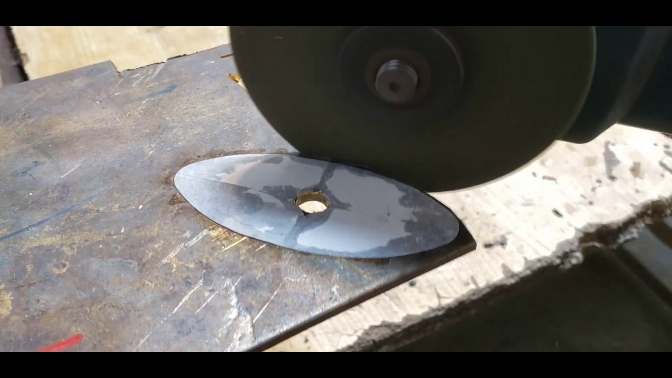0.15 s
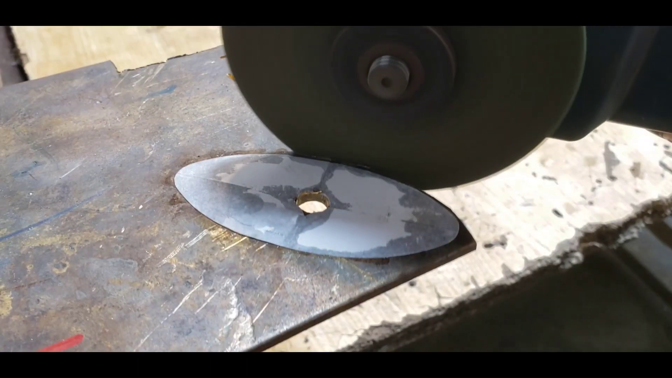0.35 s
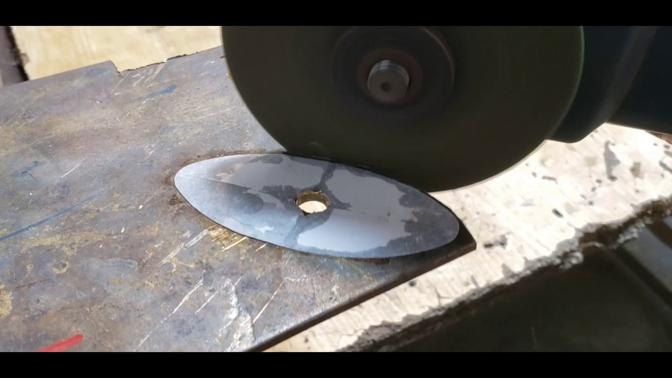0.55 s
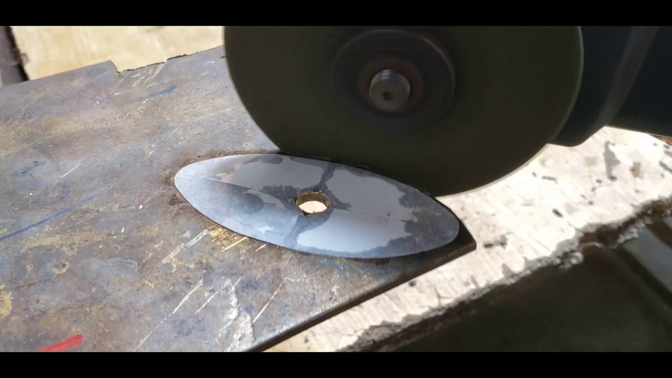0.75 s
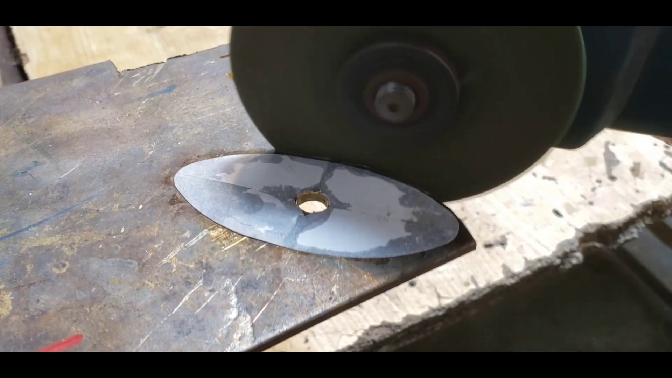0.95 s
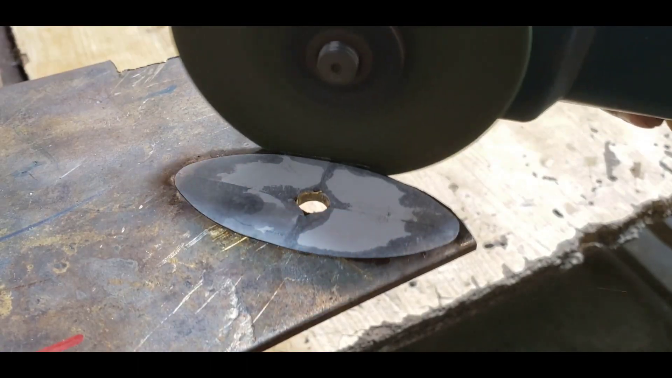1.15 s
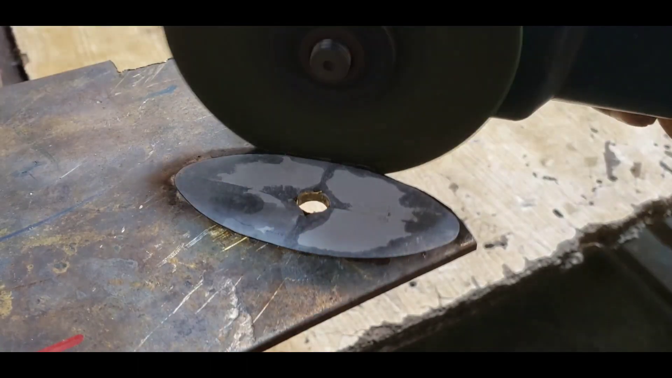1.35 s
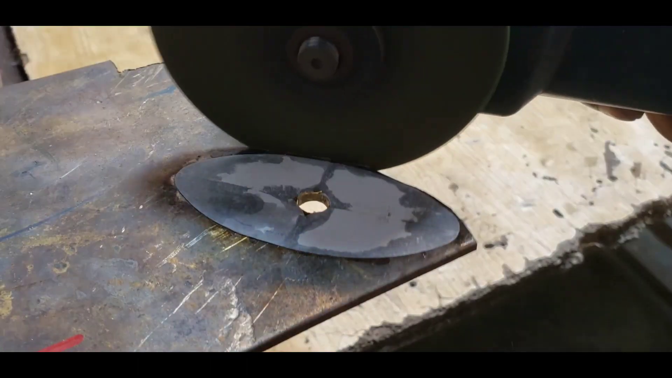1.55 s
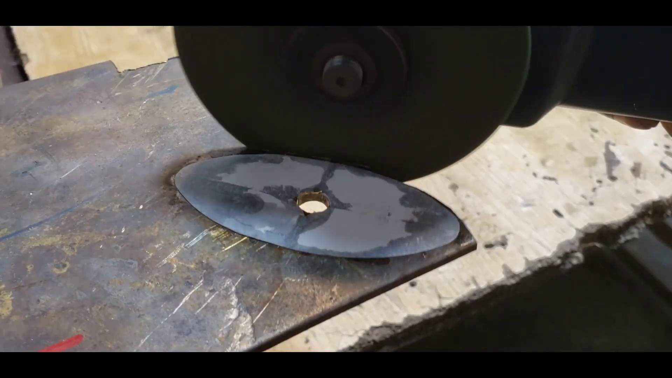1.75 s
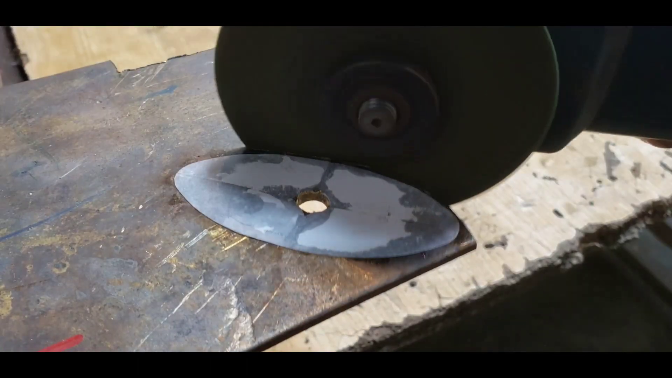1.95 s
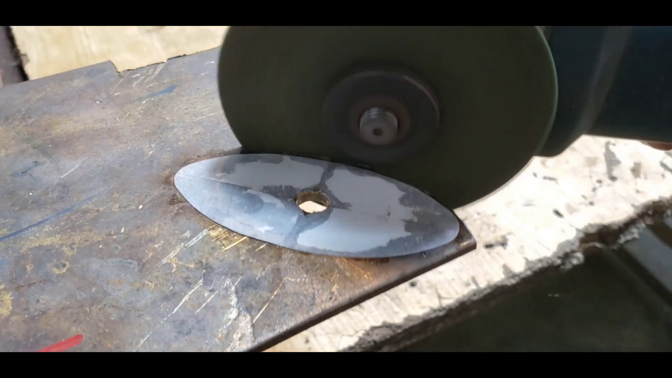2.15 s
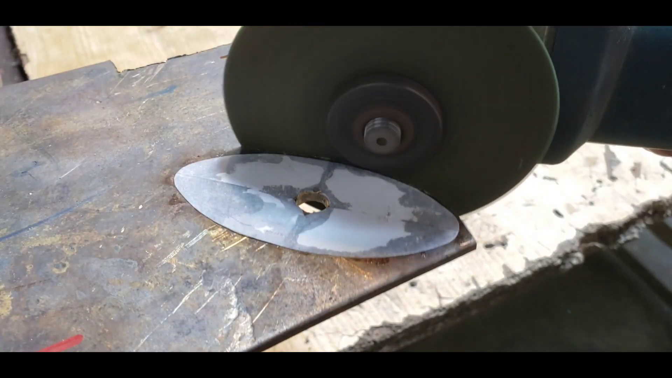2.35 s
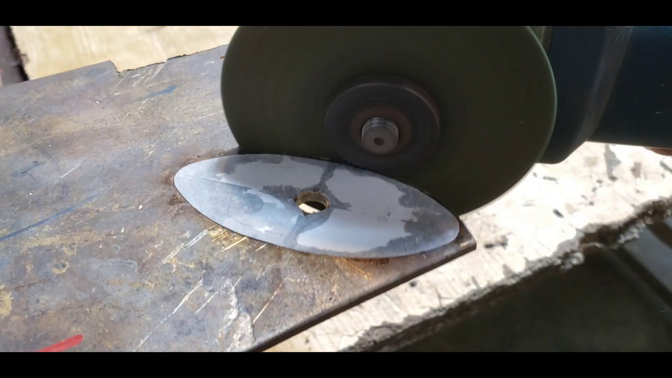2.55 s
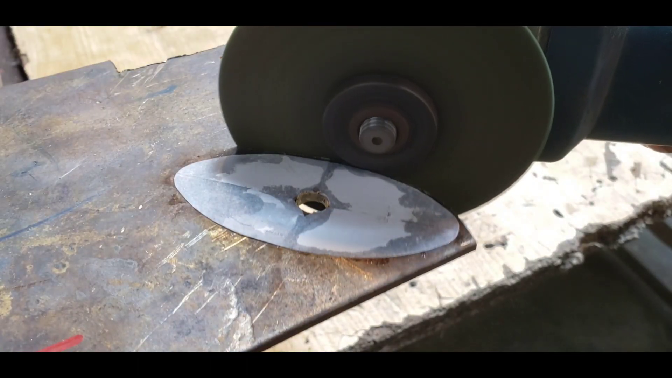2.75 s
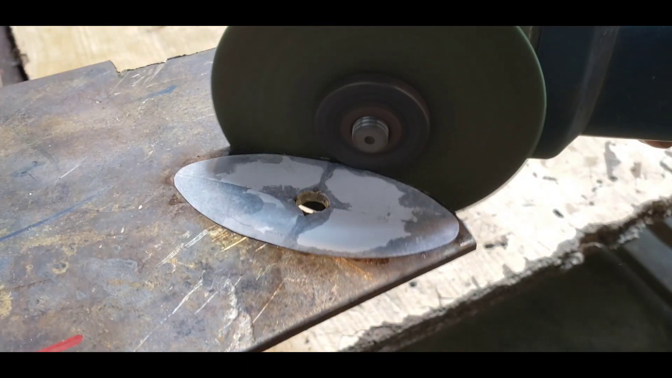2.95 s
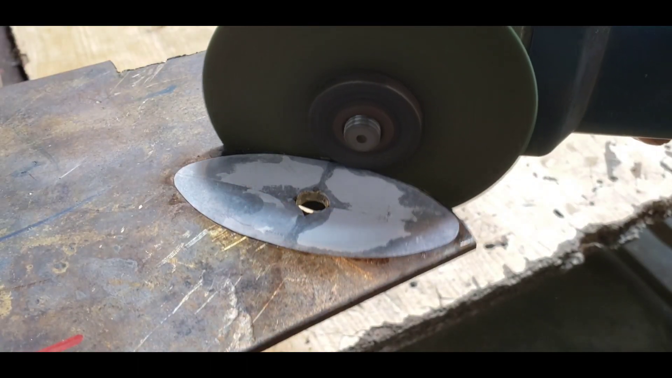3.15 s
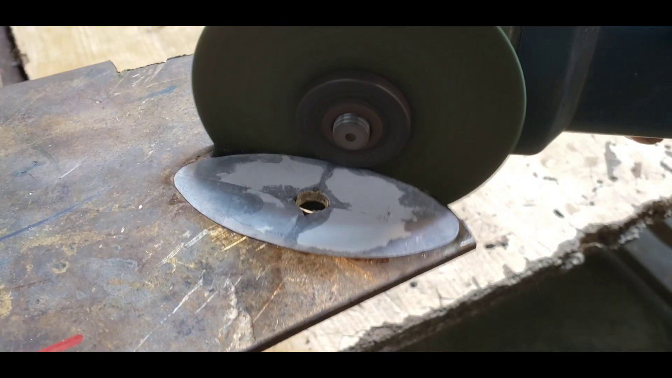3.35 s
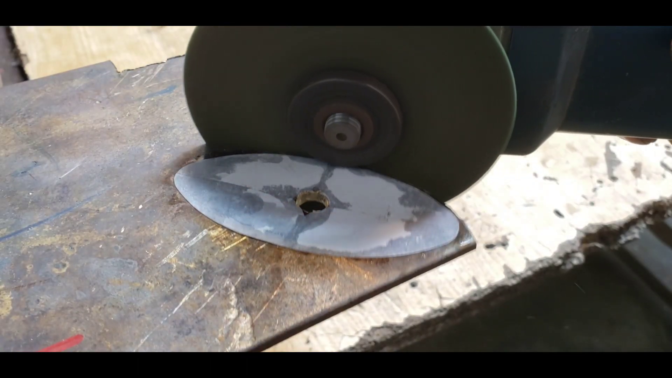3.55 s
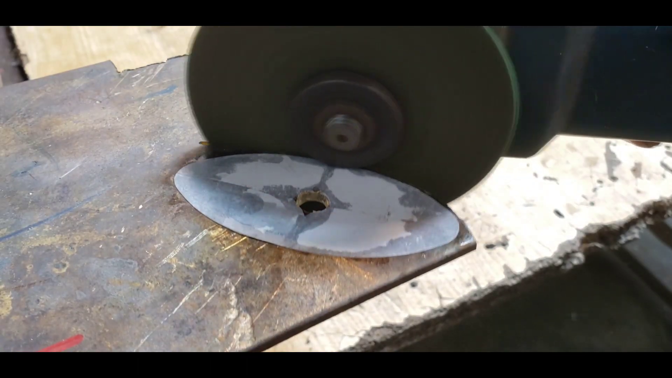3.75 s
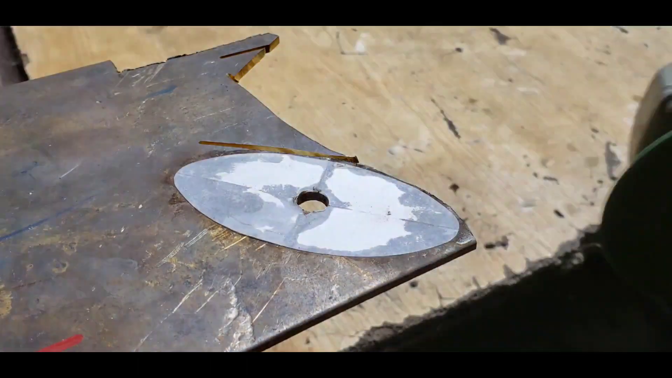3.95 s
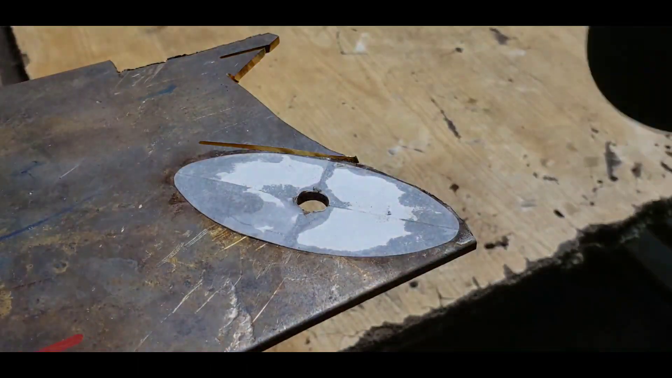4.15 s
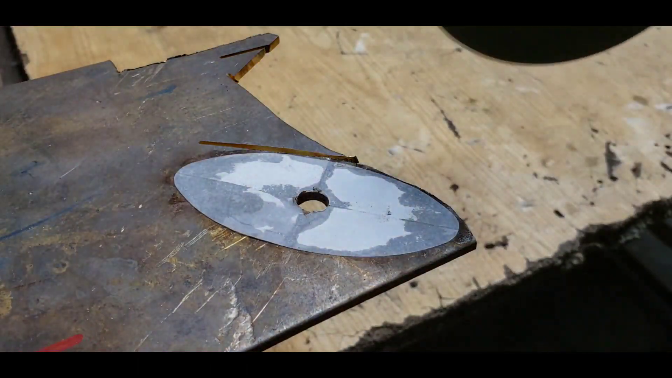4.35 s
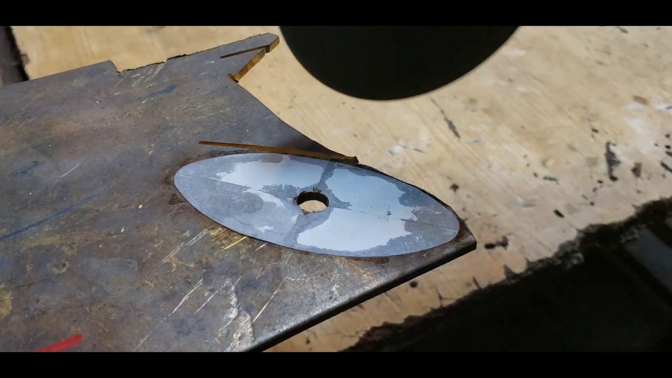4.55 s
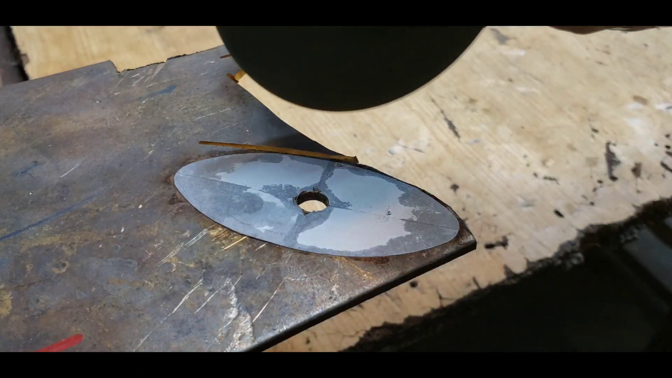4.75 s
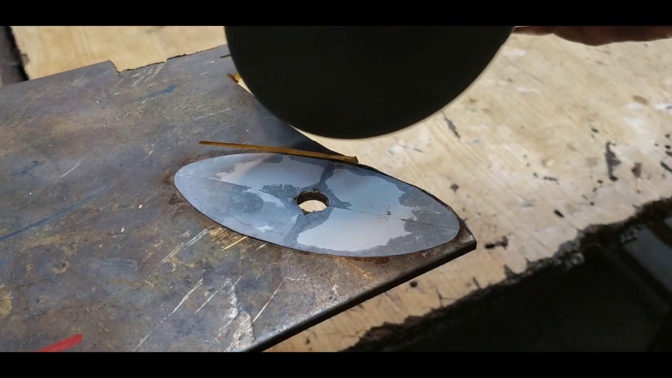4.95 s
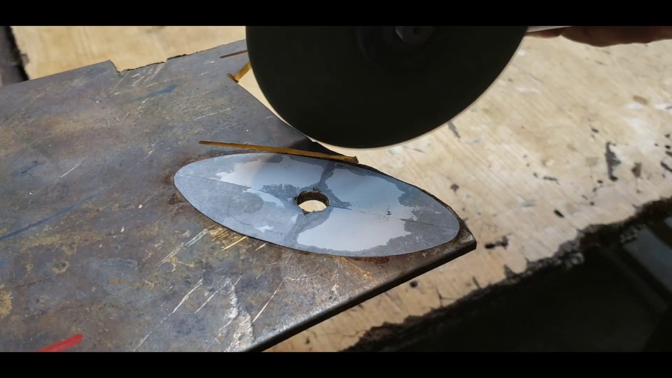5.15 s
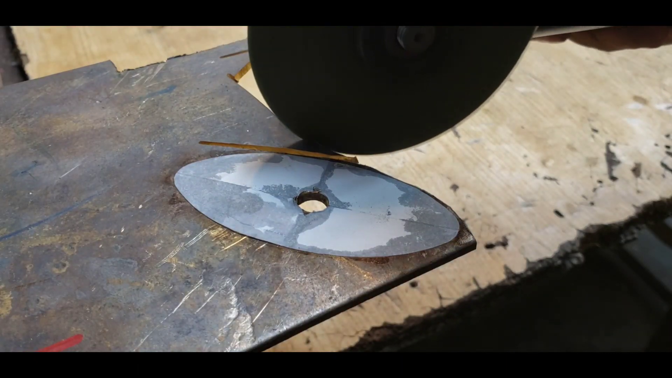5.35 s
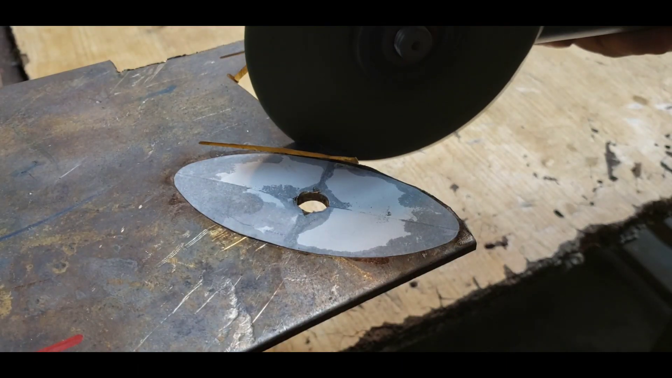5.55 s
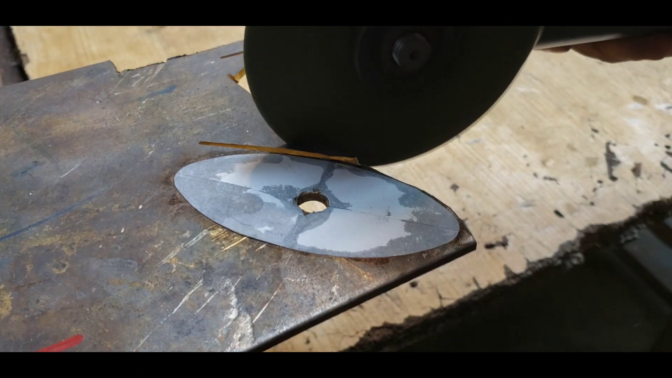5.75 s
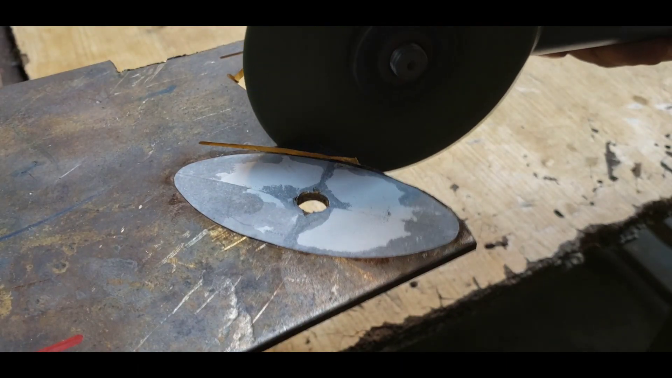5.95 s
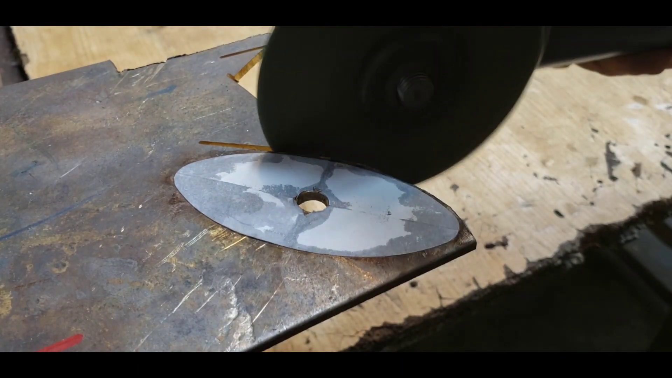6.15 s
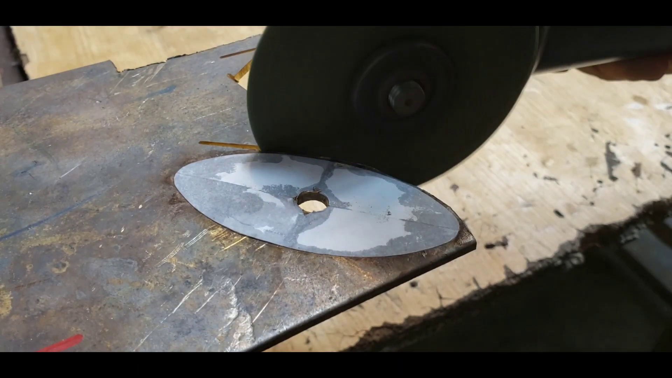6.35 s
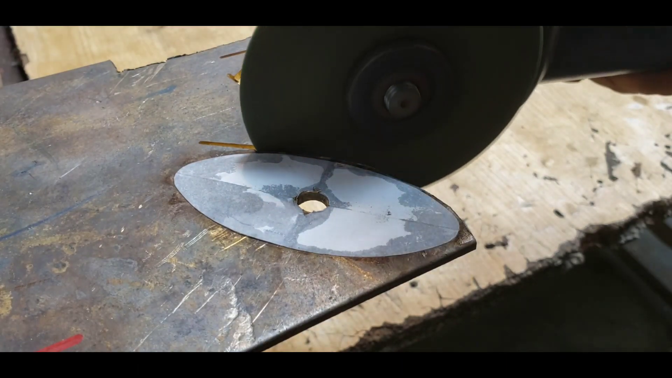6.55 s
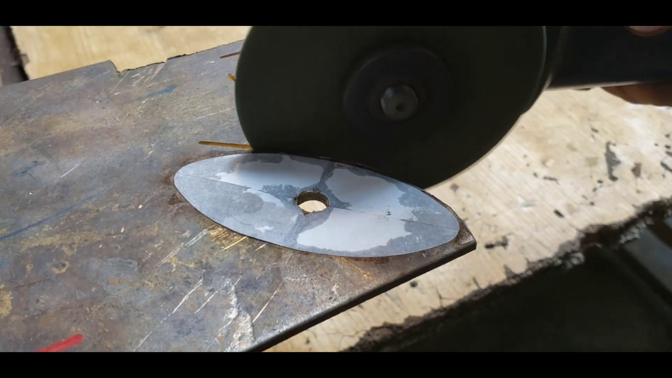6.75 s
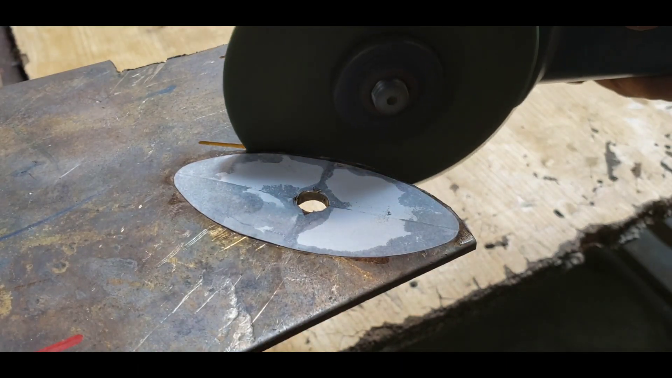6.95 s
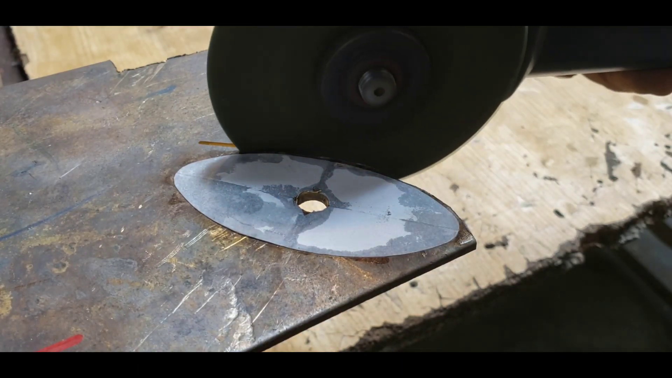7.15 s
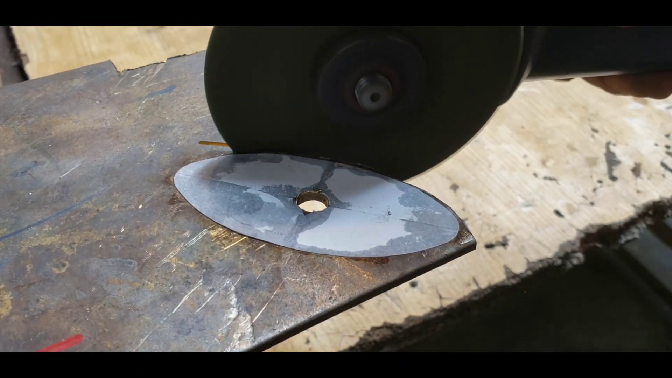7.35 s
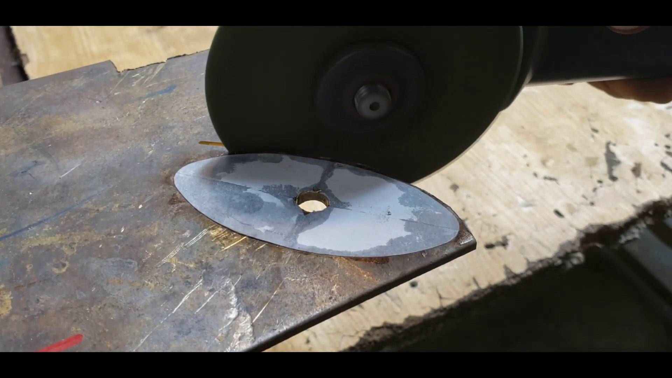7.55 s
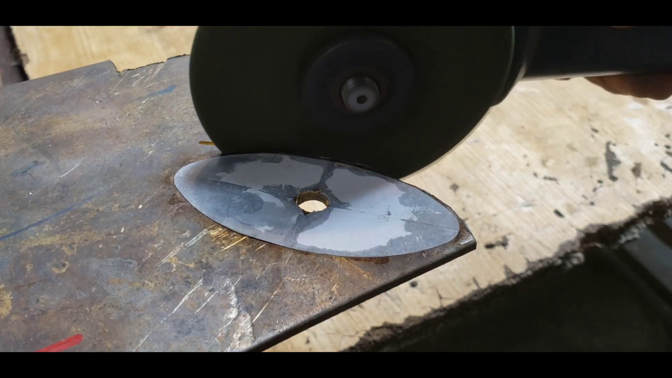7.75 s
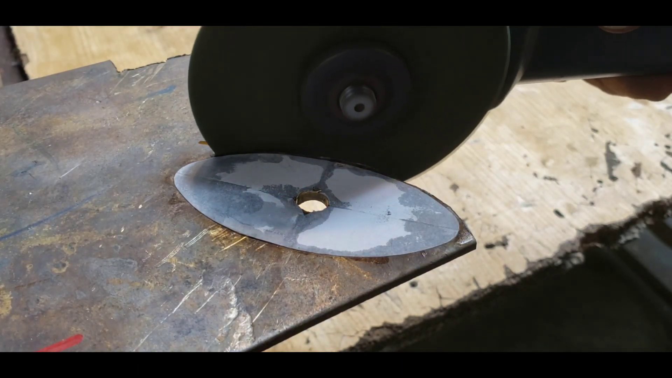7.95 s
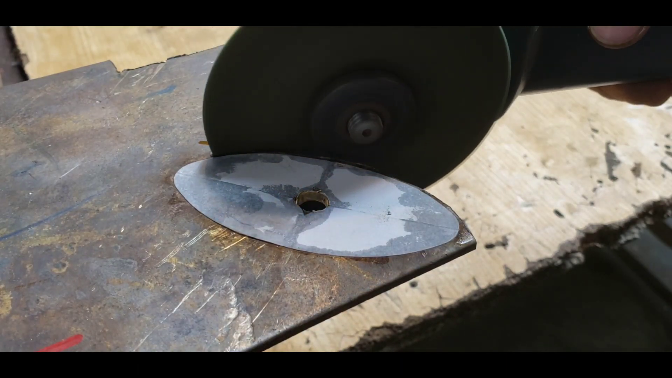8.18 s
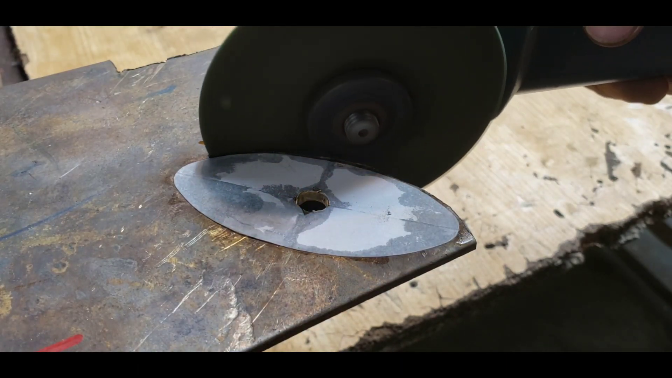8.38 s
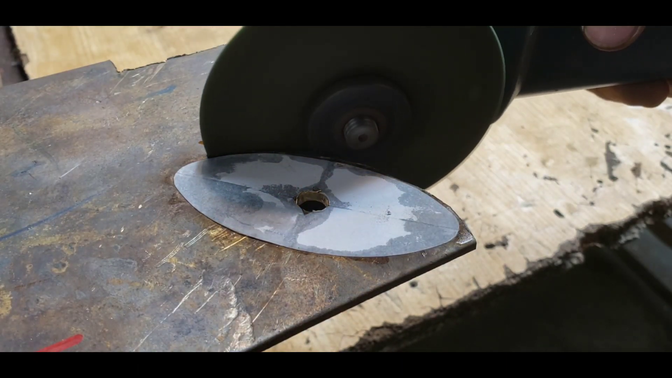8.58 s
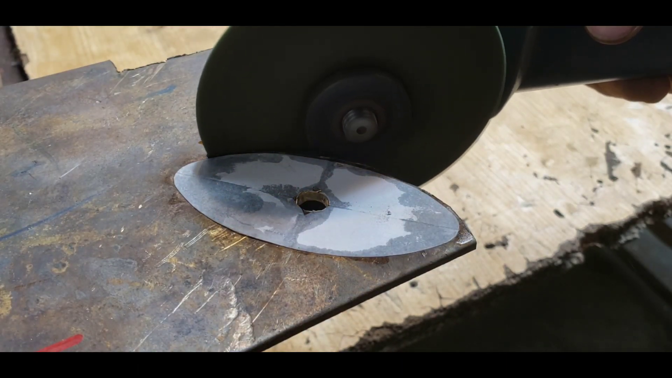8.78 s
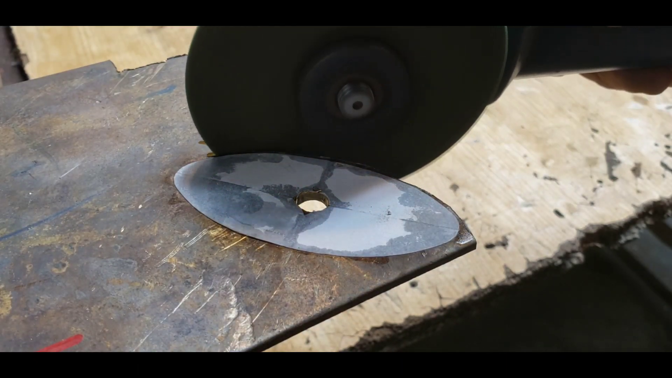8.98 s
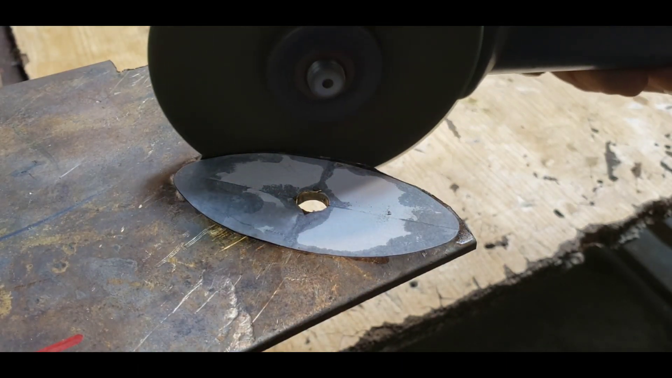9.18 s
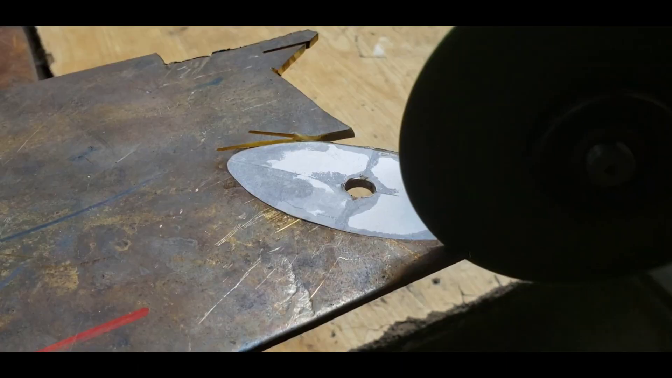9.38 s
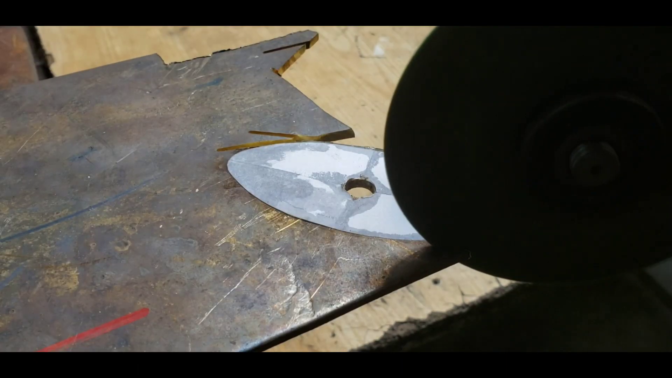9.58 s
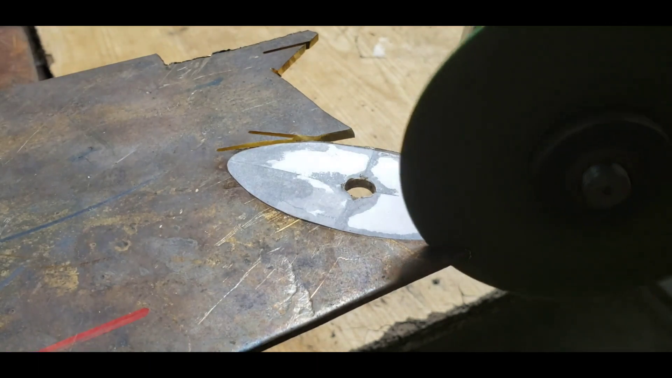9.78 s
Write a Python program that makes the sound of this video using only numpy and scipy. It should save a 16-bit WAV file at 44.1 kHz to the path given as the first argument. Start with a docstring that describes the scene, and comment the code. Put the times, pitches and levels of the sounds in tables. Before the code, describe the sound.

Gritty, ringing grinding of thin steel with whining ridges, a short pause of free-running motor whine and fan hiss, then brighter grinding.

```python
"""An angle grinder works the edge of a small steel blade on a workshop bench, is lifted, runs up freely, and bites again.
While it grinds, the same grit passes on every turn: the rasp is a stack of harmonics that sinks under load and sweeps
through the ringing modes of the steel, and ridges worn into the rim whine. Throughout, motor and gears whine above the
hum of the wheel, noise of the cooling fan hisses and the bench rumbles. In the pause an automatic gain control creeps
up, so the free-running machine swells until the wheel lands."""
import sys
import numpy as np
from scipy import signal
from scipy.fft import rfft, irfft, next_fast_len
from scipy.io import wavfile
from scipy.ndimage import uniform_filter1d

SR = 44100
rng = np.random.default_rng(int(sys.argv[2]) if len(sys.argv) > 2 else 0)


def master(y):
    """Save y as 16-bit WAV."""
    cut = np.clip(np.atleast_2d(y).T, -1, 1)
    pcm = np.round(cut * 32767)  # scale
    wavfile.write(sys.argv[1], SR, pcm.astype(np.int16))


N = 433062
T = np.arange(N) / SR


def undb(db):
    """Amplitude ratio of a level: 20 dB is a factor of ten."""
    return 10 ** (np.asarray(db) / 20)


def unit(x):
    """Normalisation to an rms of 1."""
    return x / np.sqrt(np.mean(x ** 2))


def curves(rows):
    """Linear interpolation: the columns of a table, after its times, at every sample."""
    times_s, *columns = np.transpose(rows)
    return [np.interp(T, times_s, column) for column in columns]


def colour(points, hz):
    """Spectral envelope: gain at hz, interpolated in dB over log frequency."""
    point_hz, point_db = np.transpose(points)
    return undb(np.interp(np.log(hz + 1), np.log(point_hz), point_db))


def resonance(hz, centre_hz, width_hz, db):
    """Lorentzian resonance: power response of one mode."""
    return undb(db) ** 2 / (1 + (2 * (hz - centre_hz) / width_hz) ** 2)


def shape(x, gain, size=4096):
    """Minimum-phase filtering: the folded cepstrum makes gain(hz) causal; one row a channel."""
    cepstrum = irfft(np.log(gain(np.fft.rfftfreq(size, 1 / SR)) + 1e-9))
    cepstrum[1:size // 2] *= 2
    cepstrum[size // 2 + 1:] = 0
    impulse = irfft(np.exp(rfft(cepstrum)))
    return signal.oaconvolve(x, impulse[None], axes=1)[:, :x.shape[1]]


def walk(rate_hz):
    """Smoothed random steps: chance with rms 1 that changes rate_hz times a second."""
    hold = int(SR / rate_hz)
    steps = np.repeat(rng.standard_normal(N // hold + 2), hold)
    return unit(uniform_filter1d(steps, hold)[:N])


# turn rate of the wheel while grinding, sagging when it is pressed on: time_s, turn_hz
FIRST_SPELL = [(0, 254.8), (.11, 255.6), (.25, 243.5), (.37, 234), (.5, 228.4), (.83, 222.8), (.92, 227.3),
               (1.0, 234), (1.07, 236.2), (1.35, 210.5), (1.46, 203.3), (1.57, 201.9), (1.77, 194.8),
               (1.88, 196.8), (1.96, 207.8), (2.11, 229.5), (2.29, 234.3), (2.41, 249.7), (2.5, 257.7),
               (2.7, 260.3), (2.85, 264), (2.92, 258.6), (3.05, 235.9), (3.19, 233.2), (3.33, 216),
               (3.66, 202.2), (3.84, 200.8)]
SECOND_SPELL = [(5.25, 359.2), (5.36, 358.6), (5.48, 351), (5.59, 334.3), (5.85, 283.3), (5.95, 266.7),
                (6.06, 254), (6.15, 251), (6.25, 254.3), (6.4, 282.8), (6.57, 302.9), (6.85, 321.6),
                (7.13, 316.6), (7.46, 291.5), (7.82, 286.7), (8.05, 275.5), (8.14, 275.8), (8.36, 291.5),
                (8.55, 294.7), (8.92, 320.3), (9.22, 335.8), (9.39, 328), (9.69, 268), (9.82, 265.5)]
# free run-up between them, as the whine at twice the motor's shaft rate: time_s, pitch_hz
RUN_UP = [(4.01, 1747), (4.114, 1906), (4.362, 2135), (4.502, 2151), (4.902, 2295), (5.16, 2345)]
GEAR_RATIO = 3.25  # motor turns per wheel turn


def wheel_speed():
    """Gear reduction: the whine of the run-up, divided down, joins the turn rates of both spells."""
    run_up = [(s, whine_hz / (2 * GEAR_RATIO)) for s, whine_hz in RUN_UP]
    return curves(FIRST_SPELL + run_up + SECOND_SPELL)[0]


# left alone, the wheel closes in on its free turn rate; HAND_S smooths the effort
FREE_HZ, SPIN_UP_S, HAND_S = 364.4, 0.37, 0.098


def effort(speed):
    """Torque balance: load, 0-1, is the speed lost to pressure plus how fast the wheel is being braked."""
    braking = -np.gradient(speed) * SR
    lost_hz = FREE_HZ - speed + SPIN_UP_S * braking
    return np.clip(uniform_filter1d(lost_hz, int(HAND_S * SR)) / FREE_HZ, 0, 1)


# strokes, each lasting until the next one or until the wheel is lifted: start_s, spot (A-E on the blade),
# dead_hz, rasp_db, sizzle_db, growl_db, hum_db, grain_db, howl_db, bounce (per turn, 0-1)
# rasp_db is the band 3.5-8 kHz at the usual load, sizzle_db (above) and growl_db (below) are relative to it;
# grain_db sets breaking grains against the repeating grit; howl_db is the peak at the usual load
STROKES = [(-.1, "A", 7640, -24.5, -1.5, -12.5, -54.5, 0, -61, 0.03),
           (0.92, "A", 7700, -25, .5, -7, -52, -1.5, -36, 0.2),
           (1.08, "A", 7500, -23, -2.5, -11.5, -51, 1, -54, 0.12),
           (1.92, "A", 4200, -23.5, 3, -12, -55, -1.5, -39.5, 0.25),
           (2.28, "B", 5050, -26.5, 6, -12.5, -55, 4.5, -63, 0.37),
           (2.979, "B", 8185, -26.5, 4, -13, -53.5, 2, -50, 0.37),
           (3.84, "E", 9045, -26, 2, -11, -54, 10, -55, 0.44),
           (5.193, "C", 9650, -21, -2, -10, -49, 1.5, -48, 0.25),
           (5.52, "E", 9035, -23, -1, -10, -50, 2.5, -33.5, 0.2),
           (5.8, "C", 9200, -23, 1, -7.5, -53, 1.5, -43, 0.3),
           (5.96, "B", 7320, -25, 3, -13, -52, 0.5, -44, 0.14),
           (6.271, "D", 8100, -27, -1, -15, -61, 0.5, -62, 0.15),
           (6.86, "D", 8360, -25, 0.5, -13.5, -57.5, -0.5, -31, 0.18),
           (7.42, "D", 6860, -26, 1, -11, -57, 0.5, -54, 0.18),
           (8.25, "D", 6890, -27, 1, -15.5, -57, -1, -58, 0.22),
           (8.78, "D", 4140, -29, 2.5, -13, -54, 3, -58, 0.31),
           (9.24, "E", 8300, -24.5, 1.5, -13.5, -55, 3.5, -49, 0.2)]
LIFT_S = 3.945  # the wheel leaves the blade


def touching(landing_s=.025):
    """Contact of wheel and blade, 0-1: each stroke, one row, fades linearly into the next or into air."""
    starts = [row[0] for row in STROKES]
    next_starts = starts[1:] + [np.inf]
    ends = [LIFT_S if start < LIFT_S < end else end for start, end in zip(starts, next_starts)]
    spans = [np.minimum(T - start, end - T) for start, end in zip(starts, ends)]
    return np.array([np.clip(span / landing_s + .5, 0, 1) for span in spans])


def per_stroke(touches):
    """Weighted mean by contact: the levels and bounce of the stroke in progress, at every sample."""
    settings = np.transpose([row[3:] for row in STROKES])
    return settings @ touches / (touches.sum(0) + 1e-9)


# rumble of the shaken bench: pitch_hz, level_db (per Hz, before normalisation)
BENCH_COLOUR = [(25, -23), (60, -9.5), (120, -1), (190, 2.5), (260, 3.5), (450, -23)]
RUMBLE_DB, RUMBLE_CONTACT_DB = -77, 17  # level in free air, rise in contact


def bench(contact):
    """Structure-borne sound: contact shakes the bench, which gives an uneven low rumble of filtered noise."""
    rumble = shape(rng.standard_normal((2, N)), lambda hz: colour(BENCH_COLOUR, hz))
    return unit(rumble) * undb(RUMBLE_DB + RUMBLE_CONTACT_DB * contact + 3.1 * walk(29))


# spectrum of the fan's air as heard, with little left above 15 kHz: pitch_hz, level_db (per Hz, before #
# normalisation)
FAN_COLOUR = [(30, -59), (120, -24.5), (200, -18), (380, -22), (520, -20.5), (850, -16), (1300, -8),
              (2300, -8.5), (3100, -7), (4900, -7.5), (5900, 0), (7600, -8), (9200, -10.5), (10200, -7.5),
              (11000, -14), (11800, -7.5), (13000, -16), (14300, -17), (15500, -38)]
# the housing rings in the air stream: pitch_hz, width_hz, level_db (over the plain air)
HOUSING_RING = (1078, 11, 13)
# swung away and back, the vents turn from the microphone and then face it: time_s, treble_db
VENT_AIM = [(3.9, 3), (4.22, -2.5), (4.45, 0), (4.7, 2), (4.95, 0.5)]
FAN_DB, FAN_DB_PER_OCTAVE = -37.5, 5.5  # level at free speed, rise with speed


def fan(turns, speed):
    """Turbulence noise: air rushes through the housing's slots, throbs once a turn and grows with speed."""
    throb, gust_db = .25, .5
    air = shape(rng.standard_normal((2, N)),
                lambda hz: colour(FAN_COLOUR, hz) * np.sqrt(1 + resonance(hz, *HOUSING_RING)))
    treble_filter = signal.butter(2, 3000, "highpass", fs=SR, output="sos")
    treble = signal.sosfiltfilt(treble_filter, air)
    air = air + treble * (undb(curves(VENT_AIM)[0]) - 1)
    air = air * (1 + throb * np.sin(2 * np.pi * turns))
    speed_db = FAN_DB_PER_OCTAVE * np.log2(speed / FREE_HZ)
    return unit(air) * undb(FAN_DB + speed_db + gust_db * walk(22))


# the wheel's hum swells briefly: time_s, rise_db
HUM_SWELLS = [(.03, 13), (.3, 13.5), (1.05, 3), (2.42, 12), (3.05, 9), (6.22, 10)]
HUM_DB, SWELL_S = -63, 0.066  # level in free air, Gaussian time scale of a swell


def wheel_hum(turns, contact, stroke_hum_db, waver_db=2, flutter_db=3.0):
    """Rotating imbalance: a sine once a turn, passed on to the bench by contact."""
    unsteady_db = flutter_db * walk(30) + waver_db * contact * walk(8)
    hum = unit(np.sin(2 * np.pi * turns) * undb(unsteady_db))
    hum_db = HUM_DB * (1 - contact) + stroke_hum_db * contact
    swell_db = sum(db * np.exp(-((T - s) / SWELL_S) ** 2) for s, db in HUM_SWELLS)
    return hum * undb(hum_db + swell_db)


# tones of the motor, the high ones from the gear mesh: multiple (of its shaft rate), level_db (relative)
WHINE_TONES = [(1, -6), (2, 1), (3, -16), (4, -4), (9, -18), (11, -17), (12, -13)]
# the gear case lifts the mesh tones that pass through its rings: pitch_hz, width_hz, level_db
GEARBOX_RINGS = [(4600, 1000, 8), (12000, 1200, 11)]
# level at free speed without load, rise with speed, rise per unit of load
WHINE_DB, WHINE_DB_PER_OCTAVE, WHINE_DB_PER_LOAD = -48, 4, 4


def gear_whine(turns, speed, load):
    """Shaft-order tones: motor and gear-mesh harmonics glide through the rings of the gear case."""
    rough_db, third_db = 1.2, -13
    angle = 2 * np.pi * turns
    whine = undb(third_db) * np.sin(3 * angle)  # third harmonic of the wheel's turn rate
    for multiple, db in WHINE_TONES:
        order = multiple * GEAR_RATIO
        ring = np.sqrt(1 + sum(resonance(order * speed, *mode) for mode in GEARBOX_RINGS))
        whine = whine + undb(db + rough_db * walk(60)) * ring * np.sin(order * angle)
    speed_db = WHINE_DB_PER_OCTAVE * np.log2(speed / FREE_HZ)
    return unit(whine) * undb(WHINE_DB + speed_db + WHINE_DB_PER_LOAD * load)


# steady whirl pitch, its level, and its rise when the wheel is shaken by contact
WHIRL_HZ, WHIRL_DB, WHIRL_CONTACT_DB = 1074, -55.5, 10


def whirl(speed, contact, waver_db=2):
    """Critical-speed whirl: the motor shaft's bending tone sets in at that rate and keeps its pitch above it."""
    onset_hz, span_hz, wander_hz = 20, 90, 4
    over_hz = GEAR_RATIO * speed - WHIRL_HZ
    shaken_db = WHIRL_CONTACT_DB * contact * np.clip(over_hz / span_hz, 0, 1)
    tone = unit(np.sin(2 * np.pi * np.cumsum(WHIRL_HZ + wander_hz * walk(25)) / SR))
    return tone * undb(WHIRL_DB + shaken_db + waver_db * walk(18)) * np.clip(1 + over_hz / onset_hz, 0, 1)


# the blade's lowest mode: pitch_hz, width_hz
HOWL_MODE = (929, 14.3)


def howl(turns, speed, db):
    """Forced resonance: the third and fourth harmonics of the bite drive the blade's lowest mode."""
    return sum(np.sin(2 * np.pi * k * turns) * np.sqrt(resonance(k * speed, *HOWL_MODE, db))
               for k in range(3, 5))


USUAL_LOAD = 0.32


def tones(turns, speed, load, touches):
    """Superposition: whine, hum, whirl and howl add up, with a phase-shifted version as their reflection."""
    contact = touches.sum(0)
    *_, stroke_hum_db, _, howl_db, _ = per_stroke(touches)
    sound = gear_whine(turns, speed, load) + wheel_hum(turns, contact, stroke_hum_db)
    sound = sound + whirl(speed, contact)
    sound = sound + howl(turns, speed, howl_db) * contact * load / USUAL_LOAD
    reflected = signal.hilbert(sound, next_fast_len(N))[:N].imag
    return np.array([sound, reflected])


# ridges worn into the rim by chatter, until ground off: start_s, end_s, ridges (round the rim),
# level_db (before CHATTER_DB is added)
RIDGES = [(0, .35, 21, -33), (0, .3, 22, -34), (0, .42, 27, -32), (.35, .9, 25, -36), (.42, .9, 27, -29),
          (.42, .9, 24, -33), (.45, .85, 19, -33), (.45, .9, 29, -36), (.92, 1.2, 28, -34),
          (.95, 1.4, 30, -35), (1.1, 1.32, 23, -32), (1.1, 1.35, 24, -32), (1.15, 1.9, 26, -33),
          (1.35, 1.95, 29, -34), (1.75, 2.1, 31, -35), (1.95, 2.3, 27, -30), (2, 2.3, 30, -35),
          (2.35, 2.95, 24, -36), (2.48, 2.9, 38, -34), (2.48, 2.9, 37, -36), (2.65, 2.92, 30, -35),
          (3, 3.25, 27, -34), (3, 3.28, 29, -35), (3.15, 3.42, 30, -35), (3.42, 3.82, 34, -35),
          (3.55, 3.82, 35, -37), (5.19, 5.52, 17, -30), (5.2, 5.48, 8, -34), (5.2, 5.4, 15, -29),
          (5.2, 5.45, 10, -37), (5.21, 5.5, 12, -31), (5.21, 5.35, 20, -33), (5.21, 5.42, 25, -32),
          (5.55, 5.85, 13, -34), (5.58, 5.8, 15, -35), (5.81, 5.89, 10, -32), (5.9, 6.1, 14, -31),
          (5.97, 6.26, 39, -35), (6.42, 7.9, 17, -32), (6.42, 6.85, 19, -37), (6.45, 7.42, 20, -35),
          (6.85, 7.42, 19, -33), (6.85, 7.25, 24, -33), (7.2, 7.85, 25, -35), (7.2, 7.85, 26, -35),
          (7.45, 8.7, 21, -37), (7.5, 8.3, 27, -35), (7.5, 8, 29, -37), (7.5, 7.95, 32, -37),
          (7.9, 8.3, 19, -31), (8.3, 8.75, 17, -33), (8.3, 8.7, 26, -35), (8.45, 8.8, 20, -35),
          (9.03, 9.35, 16, -34), (9.25, 9.7, 20, -36)]
CHATTER_DB, RIDGE_UNEVENNESS = 2.5, 0.54  # gain of all ridges; error of their spacing (radians)


def chatter(turns, fade_s=.05, waver_db=1.5, slip=.3):
    """Regenerative chatter: each ridge set sings a wavering multiple of the turn rate, with weak neighbours."""
    out = np.zeros((2, N))
    for start, end, ridges, db in RIDGES:
        on = (T > start - fade_s / 2) & (T < end + fade_s / 2)
        depth = np.clip(np.minimum(T[on] - start, end - T[on]) / fade_s + .5, 0, 1)
        around = 2 * np.pi * (turns[on] + rng.random())
        uneven = RIDGE_UNEVENNESS * np.sin(around + 2 * np.pi * rng.random())
        angle = ridges * around + uneven + slip * walk(70)[on]
        level = undb(CHATTER_DB + db + waver_db * walk(30)[on])
        out[:, on] += depth * level * np.array([np.cos(angle), np.sin(angle)])
    return out


def rim(turns, size=512, order=82):
    """Periodic excitation: the force of a rough profile that repeats each turn and slowly wears into a new one."""
    memory_turns, run_in = 27, 120  # the run-in turns settle the wear and are dropped
    harmonics = rng.standard_normal((int(turns[-1]) + run_in + 2, order, 2)) @ np.array([1, 1j])
    wear = np.exp(-1 / memory_turns)
    harmonics = signal.lfilter([1], [1, -wear], harmonics, axis=0)[run_in:]
    # long waves round the rim are shallower than short ones; the first belongs to the hum
    harmonics = harmonics * undb(np.interp(np.arange(order), [2, 4, 8, 11, 16], [-5, -2, -1, -6, 0]))
    harmonics[:, :2] = 0
    track = irfft(harmonics, size, axis=1).ravel()
    # read at twice the sample rate against aliasing
    position = np.interp(np.arange(2 * N) / 2, np.arange(N), turns) * size
    force = np.interp(position, np.arange(len(track)), track)
    return unit(signal.resample_poly(force, 1, 2))


# modes of the blade on its bench: pitch_hz, width_hz, then level_db (over the plain rasp) rubbed at spot A, B, C, D, E
BLADE_MODES = [(949, 18.5, 17, 13, 11, 8, 16), (1711, 70, -18, 9.5, 12.5, 13.5, 13.5),
               (1897, 32, 13, 6.5, -21, -18, -11), (2014, 48, 16, -15, -2, 6, -10),
               (2844, 81, 2.5, -16, 14, -19, 12), (3680, 130, -5, -14, 15.5, -18, 10),
               (4290, 61, 0.5, 2, 16, 4.5, 8), (4960, 110, 2, -17, -5, 5, -8),
               (5274, 250, -1.5, -18, 11.5, 5.5, 6.5), (6060, 290, 0.5, 3, 5.5, 2, 2),
               (6840, 150, -2, 4, -2, -22, -15), (7140, 25, 5, 9, -0.5, -13, -35),
               (7635, 39, -23, -11, -8, 11, -4), (8030, 59, -5, -3, -12, 0.5, -20),
               (8900, 135, 3.5, 3, 15, 1.5, 17.5), (9950, 200, 1, 4, 9, 2, 4),
               (11400, 89, -18, -15, -13.5, -16, -3), (12250, 200, 8, 4.5, 12.5, 7, 13)]
# the plate under the blade rattles with a rough, steady ring: pitch_hz, width_hz, level_db at spot A, B, C, D, E
PLATE_RING = (4290, 75, -1, 9, 11, -2, 10)
# spectrum of the plain rasp: pitch_hz, level_db (per Hz, before normalisation)
RASP_COLOUR = [(60, -33.5), (150, -30.5), (400, -17.5), (570, -19.5), (900, -19), (1600, -16), (2500, -17),
               (3300, -10), (4300, -6), (5700, -1.5), (7800, -1.5), (10500, -4), (13500, -8), (15600, -11)]
# breaking grains hiss mostly in the treble: pitch_hz, level_db (against the repeating grit)
GRAIN_COLOUR = [(1500, -1), (2600, -1.5), (4300, 0)]
# a stroke's dead frequency, which the blade hardly answers: width_hz, level_db (of the share taken away)
DEAD_BAND = (900, -.5)


def blade(grit, grains, spot, dead_hz, grain_ring_db=-6):
    """Modal response: at one spot the grit sings through the modes, breaking grains hiss and rattle the plate."""
    hiss_db = -6

    def body(hz):
        return colour(RASP_COLOUR, hz) * np.sqrt(1 - resonance(hz, dead_hz, *DEAD_BAND))

    def modes(hz):
        return sum(resonance(hz, mode_hz, width_hz, db[spot]) for mode_hz, width_hz, *db in BLADE_MODES)

    def rough(hz):
        plate = resonance(hz, *PLATE_RING[:2], PLATE_RING[2 + spot])
        return undb(hiss_db) ** 2 + undb(grain_ring_db) ** 2 * modes(hz) + plate

    singing = shape(grit, lambda hz: body(hz) * np.sqrt(1 + modes(hz)))
    breaking = shape(grains, lambda hz: body(hz) * colour(GRAIN_COLOUR, hz) * np.sqrt(rough(hz)))
    return unit(singing + breaking)


SPOTS = "ABCDE"  # order of the blade's level columns
# pressing harder than usual raises the rasp and, on top of that, its sizzle and growl (dB per unit of load)
RASP_DB_PER_LOAD, SIZZLE_DB_PER_LOAD, GROWL_DB_PER_LOAD = 2, 2.5, 4.5


def grinding(turns, load, touches, tremor_db=0.75):
    """Source and filter: the rim rubs the blade, two versions; stroke and load set level, growl and sizzle."""
    level_db, sizzle_db, growl_db, _, grain_db, _, bounce = per_stroke(touches)
    # the wheel runs slightly out of true and bites harder once a turn
    bite = np.exp(bounce * np.cos(2 * np.pi * turns))
    grit = np.array([rim(turns), rim(turns)]) * bite
    grains = rng.standard_normal((2, N)) * bite * undb(grain_db)
    steel = np.zeros((2, N))
    for (_, spot, dead_hz, *_), touch in zip(STROKES, touches):
        on = touch > 0
        steel[:, on] += touch[on] * blade(grit[:, on], grains[:, on], SPOTS.index(spot), dead_hz)
    contact = touches.sum(0)
    press = load - USUAL_LOAD
    level_db = level_db + RASP_DB_PER_LOAD * press
    sizzle_db = sizzle_db + SIZZLE_DB_PER_LOAD * press
    growl_db = growl_db + GROWL_DB_PER_LOAD * press
    bands = [("lowpass", 3500, growl_db), ("bandpass", (3500, 8000), 0), ("highpass", 8000, sizzle_db)]
    # each band is levelled over a tenth of a second, then set to its own level
    rasp, size = 0, SR // 10
    mean_contact = uniform_filter1d(contact, size) + 1e-6
    for kind, hz, db in bands:
        band_filter = signal.butter(4, hz, kind, fs=SR, output="sos")
        band = signal.sosfiltfilt(band_filter, steel + 1e-18)
        power = (uniform_filter1d(band ** 2, size) + 1e-6) / mean_contact
        rasp = rasp + band / np.sqrt(power) * undb(level_db + db)
    return (rasp * (contact > 0) + chatter(turns) * bite) * undb(tremor_db * walk(35))


def workshop(pair, wet_db=-9, size=16384):
    """Reverberation: a short decaying wash from bench and walls blurs gliding lines and outlasts the lift."""
    t60_s = .24
    tail = rng.standard_normal((2, size)) * np.exp(-np.log(1000) * T[:size] / t60_s)
    tail = tail / np.sqrt(np.sum(tail ** 2, axis=1, keepdims=True))
    wet = undb(wet_db)
    wash = signal.oaconvolve(pair, tail, axes=1)[:, :N]
    return (pair + wet * wash) / np.sqrt(1 + wet ** 2)


def ports(pair, pan, likeness, lag_s):
    """Interchannel coherence: left hears the first version, right a blend of both, later by lag_s and weaker."""
    size = next_fast_len(N, True)
    bins_hz = np.fft.rfftfreq(size, 1 / SR)
    first, second = rfft(pair, size)
    point_hz, share = np.transpose(likeness)
    alike = np.clip(np.interp(np.log(bins_hz + 1), np.log(point_hz), share), 0, 1)
    blend = alike * first + np.sqrt(1 - alike ** 2) * second
    right = blend * np.exp(-2j * np.pi * bins_hz * lag_s)
    left_gain = colour(pan, bins_hz)
    # the two gains average 1
    return irfft(np.array([first * left_gain, right]) * 2 / (1 + left_gain), size)[:, :N]


# balance: pitch_hz, left_minus_right_db
RASP_PAN = [(200, 9.5), (1200, 5.5), (2400, 11.5), (4400, 14), (8000, 9), (15000, 13.5)]
MACHINE_PAN = [(200, 5.8), (400, 3.3), (800, 2.9), (2400, 0.58), (4400, 9.8), (15000, 5.9)]
# likeness of the two channels: pitch_hz, likeness (0-1)
RASP_LIKENESS = [(100, 0.2), (600, 0.78), (2000, 0.2), (5000, 0.21), (14000, 0.05)]
MACHINE_LIKENESS = [(50, 0.35), (150, 0.49), (640, 0.84), (1400, 0.67), (3100, 0.085), (15000, 0.022)]
# the place of contact drifts towards the middle: time_s, left_minus_right_db (added to the rasp's balance)
PAN_DRIFT = [(1, 1), (3.9, -0.2), (5.6, 0), (6.3, -1), (9.2, -1.4), (9.7, -4)]


def scene():
    """Common cause: one shaft speed, with a slight flutter, and the load that it reveals drive everything."""
    flutter = .001 * walk(90)
    speed = wheel_speed()
    turns = np.cumsum(speed * (1 + flutter)) / SR
    load, touches = effort(speed), touching()
    machine = bench(touches.sum(0)) + fan(turns, speed) + tones(turns, speed, load, touches)
    rubbing = workshop(grinding(turns, load, touches)) * undb(0.6)
    rasp = ports(rubbing, RASP_PAN, RASP_LIKENESS, lag_s=.00007)
    rasp = rasp * undb(np.outer([.2, -.8], curves(PAN_DRIFT)[0]))
    return rasp + ports(machine, MACHINE_PAN, MACHINE_LIKENESS, lag_s=0)


CEILING_DB, HOLD_DB = -15, 5.5  # ceiling, and the range below it in which the gain holds
ATTACK_S, WAIT_S, RELEASE_DB_PER_S = 0.0046, 0.46, 16.5  # time to duck, wait, recovery


def gain_control(x, size=256):
    """Feedback compression: gain ducks quickly at the ceiling, holds just below, and after a wait creeps up."""
    power = uniform_filter1d(np.mean(x ** 2, axis=0), 6 * size)[::size]
    level_db = 10 * np.log10(power + 1e-12)
    step_s, gain_db, quiet_s, gains_db = size / SR, 0, 0, []
    for over_db in level_db - CEILING_DB:
        excess_db = over_db + gain_db
        quiet_s = quiet_s + step_s if excess_db < -HOLD_DB else 0
        if excess_db > 0:
            gain_db -= excess_db * min(step_s / ATTACK_S, 1)
        elif quiet_s > WAIT_S:
            gain_db += step_s * RELEASE_DB_PER_S
        gains_db.append(gain_db)
    return x * undb(np.interp(T, T[::size], gains_db))


TOP_HZ = 15700


def record(dry):
    """Band limiting: after the gain control, a steep elliptic low-pass removes the top."""
    low_pass = signal.ellip(12, .2, 80, TOP_HZ, fs=SR, output="sos")
    return signal.sosfilt(low_pass, gain_control(dry))


dry = scene()
out = record(dry)
master(out)
```